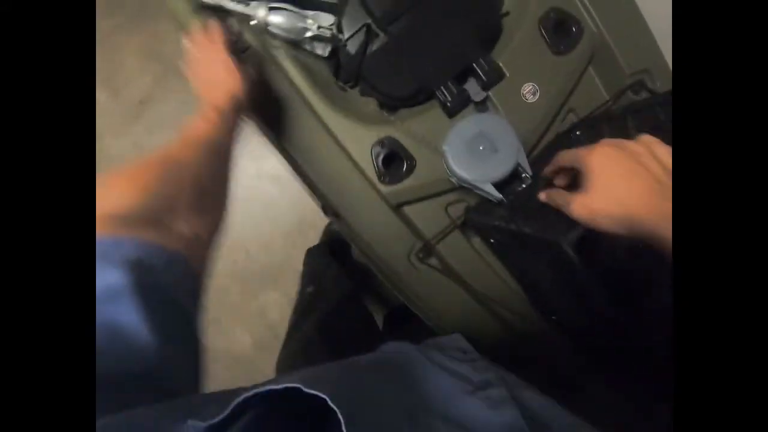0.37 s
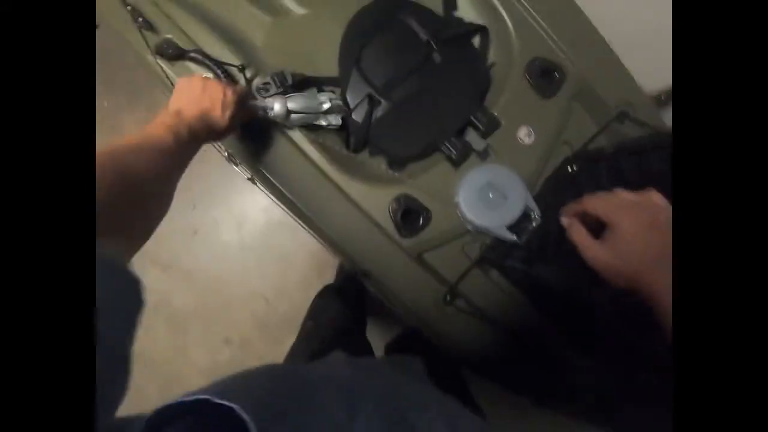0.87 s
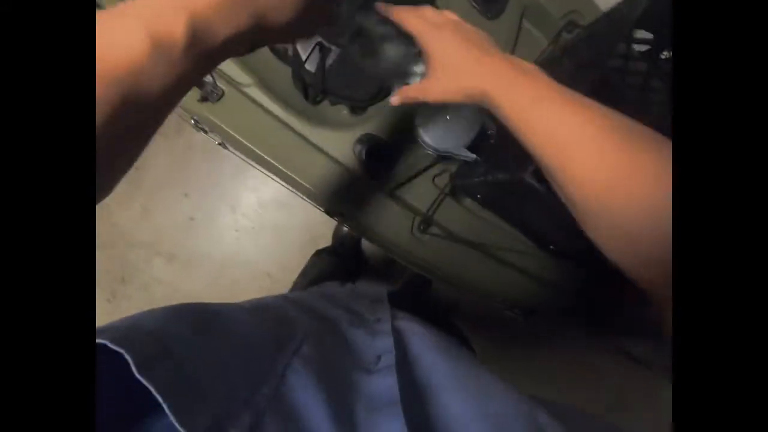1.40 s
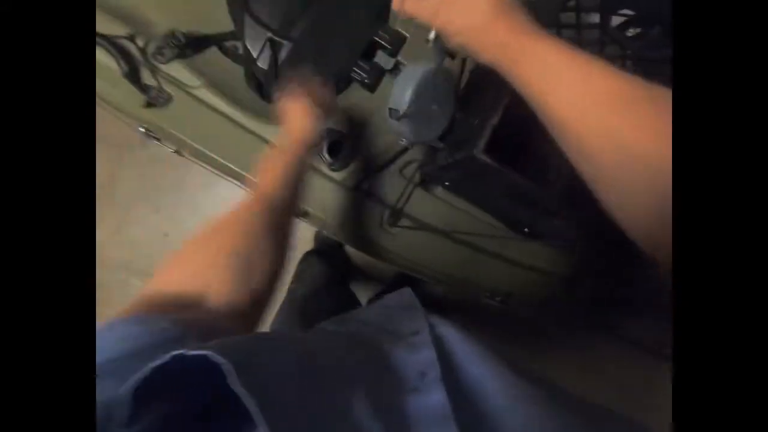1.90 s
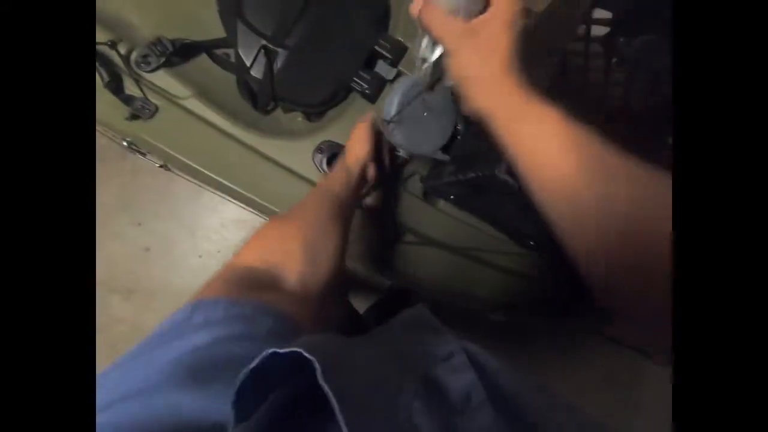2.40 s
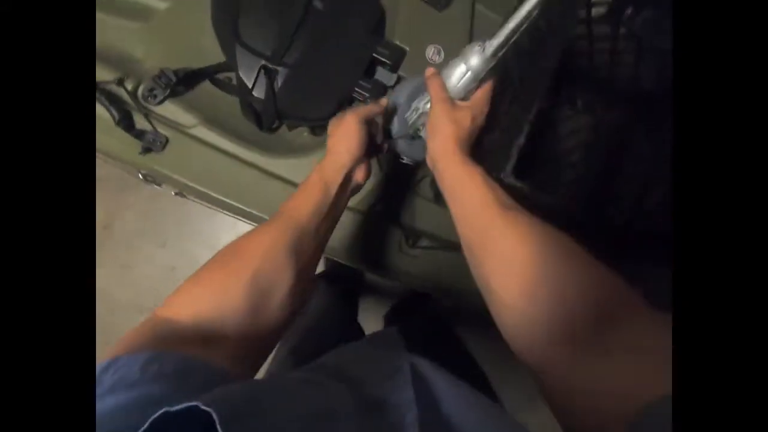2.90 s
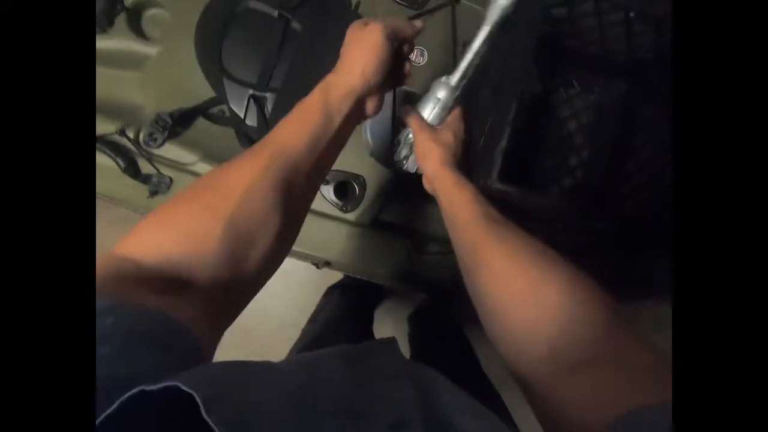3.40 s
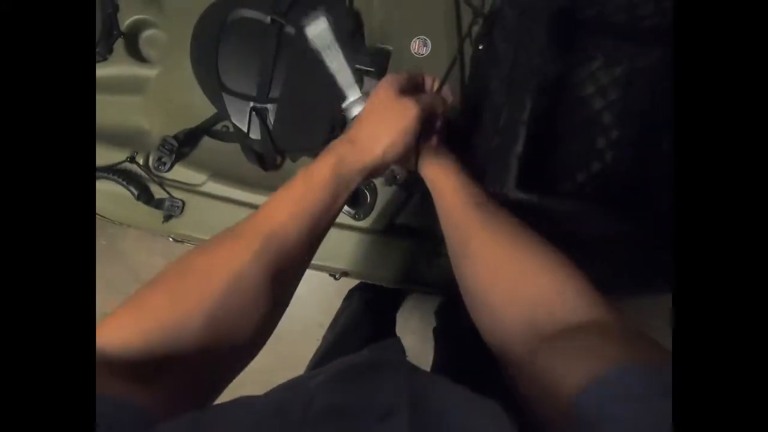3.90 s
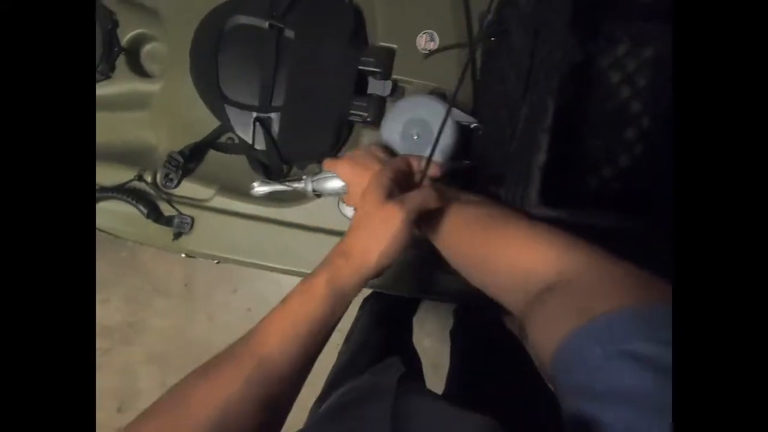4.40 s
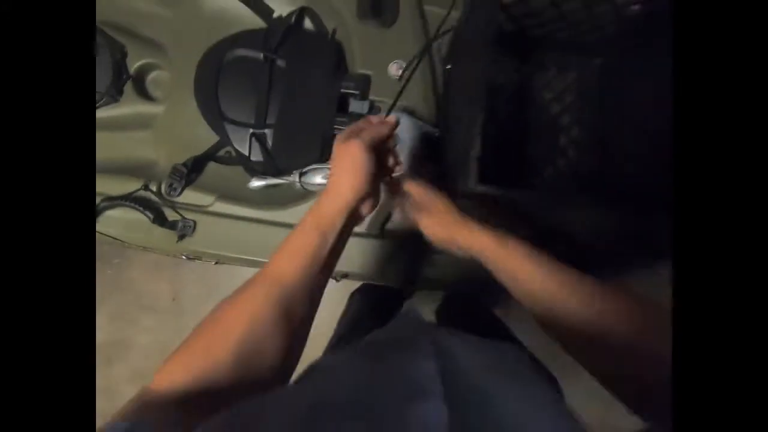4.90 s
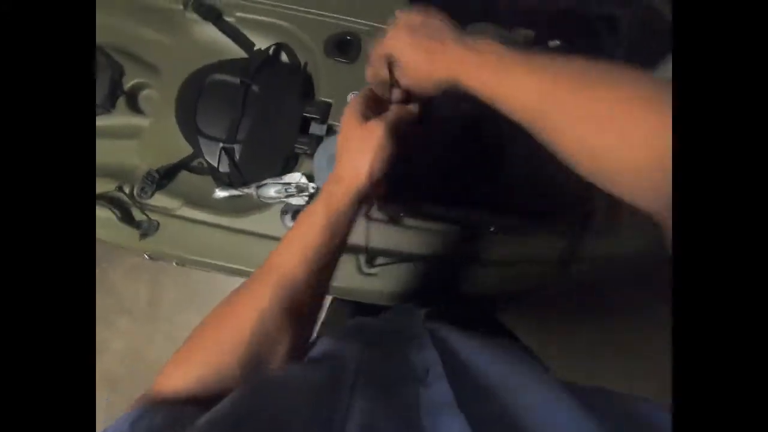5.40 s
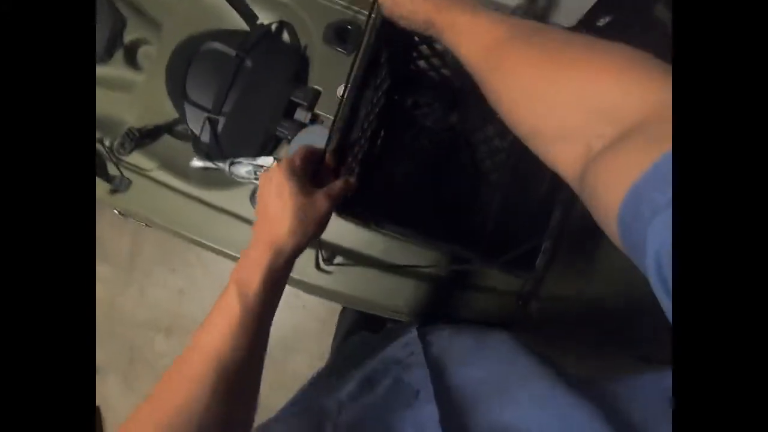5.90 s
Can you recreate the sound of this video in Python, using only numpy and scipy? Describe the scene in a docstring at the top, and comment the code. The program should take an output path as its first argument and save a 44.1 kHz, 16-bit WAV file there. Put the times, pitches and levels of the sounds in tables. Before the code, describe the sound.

Close handling of plastic and metal in a bare garage with a short echo and faint room air. From 0 a soft rubbing rumble, with dull hull knocks at 0.25-0.6 and a tight clatter with thin metallic clinks at 0.75-0.9. Rustling continues; a crisp snap with a clink at 1.24 and more sharp ticks and short clinks at 1.6-1.75. Around 1.9-2.4 it is nearly quiet. A soft thunk at 2.46, then firm hollow knocks and clicks from 2.78 to 3.2, with deep boom and dragging. A brief hollow rub at 3.5, a very sharp crack at 3.76, then dense clatter to 4.05. The hardest thunk lands at 4.36, followed by knocks, chatter and light clinks to 4.8. After a lull near 5, small plastic clicks, muted knocks and rustle at 5.2-5.7, ribbed brushing at 5.8 and a last light knock at 5.95.

```python
"""A hollow plastic hull, close under the microphone in a garage, booms when knocked and rumbles when rubbed.
Blows ring its modes and lumpy noise drives them, as hands shift a plastic crate and a metal rod on it.
Hard edges click as resonant noise bursts, and the rod clinks in decaying sine modes.
Cord and sleeves rustle, a socket rubs and ribs are stroked, all as grainy filtered noise.
The bare walls answer with noise tails, over faint still-room air."""
import sys
import numpy as np
from scipy import signal
from scipy.fft import rfft, irfft, next_fast_len
from scipy.io import wavfile
from scipy.ndimage import map_coordinates

SR = 44100
rng = np.random.default_rng(int(sys.argv[2]) if len(sys.argv) > 2 else 0)


def undo_db(level):
    """Turn decibels back into plain size, where 20 dB means ten times bigger."""
    steps = np.asarray(level, float) / 20
    return 10 ** steps


def transcribe(u):
    """Save the signal u as a 16-bit wav file named by the first command-line argument.

    u: samples, shape (n,) or (channels, n), limited to [-1, 1]; the rate is SR.
    q: integer samples, one column per channel.
    """
    v = np.clip(np.atleast_2d(u).T, -1, 1)
    q = np.round(v * 32767).astype(np.int16)
    wavfile.write(sys.argv[1], SR, q)


N = 266364  # samples

# blows on the hull: (time [s], level [dB], favoured pitch [Hz], boom lift [dB], damping by hands [factor])
BLOWS = [(.239, -15, 230, 5.5, 1.04), (.308, -15.5, 154, -4, 2.9), (0.368, -23.5, 156, -22, 0.62),
         (.418, -24, 326, -26, 1.03), (.555, -21, 185, -0.5, 0.36), (.599, -18.5, 181, -8, 2.6),
         (.761, -20.5, 237, -30, 0.56), (.8, -12, 189, -23, 0.75), (.83, -13, 261, -21, 1.7),
         (1.169, -32, 359, -24, .4), (1.364, -32, 464, -30, 1.1), (1.613, -28, 406, -24, 1.2),
         (2.099, -35, 156, -30.5, .4), (2.463, -17, 390, -4.5, 0.72), (2.551, -18.5, 225, 2, 3),
         (2.78, -8.5, 490, -10, 1.15), (2.79, -5, 939, -30, 1.9), (2.828, -13, 200, 12, 1.6),
         (2.889, -13.5, 356, -18, 2.8), (2.985, -16, 377, -19, 0.97), (3.051, -17, 298, -27, 0.58),
         (3.1, -13, 367, -12, 2.8), (3.167, -0.5, 220, 1, 1.23), (3.2, -6.5, 202, 4, 0.63),
         (3.764, -17, 500, -22.5, 0.86), (3.815, -8, 204, -3, 1.8), (3.874, -4, 238, -7, 1.7),
         (4.021, -4.5, 470, -6, 2.2), (4.049, -14, 245, -0.5, 0.52), (4.138, -13, 363, -23, 1.54),
         (4.359, 4.5, 248, -32, 1.18), (4.385, -3.5, 350, -23, 1.3), (4.408, -2.5, 196, 6, 0.49),
         (4.509, -9, 233, -26, 0.77), (4.589, -9, 224, 0, 1.4), (4.608, -7, 226, -16, 1.4),
         (4.709, -22.5, 210, 2, 2), (4.953, -19, 172, -2, 0.78), (5.271, -26, 232, -4.5, 0.45),
         (5.46, -19.5, 750, -0.5, 1.5), (5.509, -23, 428, -23, 0.89), (5.579, -17.5, 303, -7, 0.91),
         (5.609, -30.5, 296, 11.5, 0.56), (5.947, -19.5, 268, 0, 1.3)]
# modes of the hull: (frequency [Hz], relative level [dB], undamped t60 [s])
HULL_MODES = [(57.7, 0.5, 0.45), (81.7, -11.5, 0.88), (99.2, -4, 0.23), (136.6, -1.5, 0.3),
              (172.7, -6.5, 0.39), (211.1, -3, 0.36), (242.3, 1, 0.18), (298.3, -9, 0.37), (306, -6, 0.16),
              (357.3, -1.5, 0.23), (414.5, -5.5, 0.26), (466.2, -7.5, 0.31), (538.4, -2, 0.13),
              (599.3, -1.5, 0.12), (700, 6, 0.038), (798, -11, 0.21), (939, -8, 0.32), (1119, 8.5, 0.035),
              (1450, -16.5, .1)]


def unit(x):
    """Scales a sound to rms 1."""
    return x / np.sqrt(np.mean(x ** 2) + 1e-20)


def along(points, hz):
    """Reads (frequency [Hz], value) points on a log frequency axis."""
    f, v = np.transpose(points)
    return np.interp(np.log(hz + 1), np.log(f + 1), v)


def bump(hz, centre_hz, octaves):
    """A smooth hill of gain around a frequency."""
    return np.exp(-(np.log2(hz / centre_hz) / octaves) ** 2)


def resonance(f, centre_hz, drive_hz, width_hz):
    """Complex response of one damped resonance; it peaks at drive over width."""
    return 1j * f * drive_hz / (centre_hz ** 2 - f * f + 1j * f * width_hz)


def wobble(rate):
    """A smooth random curve with rate knots a second."""
    knots = rng.standard_normal(int(N * rate / SR) + 4)
    return map_coordinates(knots, [np.arange(N) * rate / SR])


def grainy(spiky_db, rate):
    """Noise of rms 1 whose level wanders from grain to grain, rate grains a second."""
    return unit(rng.standard_normal(N) * undo_db(spiky_db * wobble(rate)))


def filtered(x, response):
    """Passes a sound through a complex response of frequency."""
    m = next_fast_len(x.shape[-1] + SR // 2)
    spectrum = rfft(x, m) * response(np.fft.rfftfreq(m, 1 / SR))
    return irfft(spectrum, m)[..., :x.shape[-1]]


def shifting(x, colour_db):
    """Passes a sound through a colour that changes in time, mean square gain 1 in each frame."""
    hz, t, z = signal.stft(x, SR, nperseg=512)
    gain = undo_db(colour_db(hz[:, None] + 1, t))
    gain = gain / np.sqrt(np.mean(gain ** 2, axis=0))
    return signal.istft(z * gain, SR, nperseg=512)[1][:N]


def add(track, s, sound):
    """Mixes a sound into the track from time s, cut at the track's end."""
    part = track[..., round(s * SR):][..., :sound.shape[-1]]
    part += sound[..., :part.shape[-1]]


def ringing(modes, t, tilt, damping, scatter_db, detune):
    """All modes struck at once, each at a new strength and sign, slightly detuned by the grip; peak 1."""
    hz, db, t60 = np.transpose(modes)[:, :, None]
    strength = undo_db(db + scatter_db * rng.standard_normal(hz.shape)) * tilt(hz)
    strength = strength * rng.choice([-1, 1], hz.shape)
    hz = hz * (1 + detune * rng.standard_normal(hz.shape))
    decay = undo_db(-60 * t * damping / t60)
    ring = np.sum(strength * decay * np.sin(2 * np.pi * hz * t), axis=0)
    return ring / np.abs(ring).max()


def gestures(rows):
    """Movements swell and fade; gives their summed gain and their last column weighted by power."""
    s, db, rise, fall, colour = np.transpose(rows)[:, :, None]
    t = np.arange(0, N + 64, 64) / SR - s
    # rises and falls below 0.02 s, negative ones too, take 0.02 s
    away = np.where(t < 0, -t / rise.clip(.02), t / fall.clip(.02))
    power = undo_db(2 * db - 40 * away)
    total = power.sum(axis=0)
    curves = np.sqrt(total), (power * colour).sum(axis=0) / total
    return [np.interp(np.arange(N) / 64, np.arange(len(c)), c) for c in curves]


def drag():
    """The dragged crate drives the hull's modes with lumpy noise and scrapes above; blows add a short skid."""
    # drags: (hardest time [s], rumble level [dB], 20 dB rise [s], 20 dB fall [s], scrape over rumble [dB])
    drags = [(0, -28, .1, 0.14, -8.5), (.35, -44.5, 2, -1.6, -6), (.62, -35.5, 0.05, 0.38, -18),
             (.82, -32, 0.2, 0.25, -6.5), (1.15, -44.5, 0.2, 0.76, 4.5), (1.61, -41.5, 0.4, 0.55, -20.5),
             (2.17, -46, 0.26, 0.16, 6), (2.61, -30, 0.31, .25, -11), (2.96, -29.5, 0.21, 0.35, -10.5),
             (3.23, -23.5, 0.02, 0.45, -25.5), (3.5, -31, 0.14, 0.3, -23), (3.92, -23.5, .2, .15, -6),
             (4.02, -23, .1, 0.23, -4), (4.25, -35, 0.06, 0.9, -38), (4.53, -20.5, 0.01, 0.14, -16.5),
             (4.68, -34, 0.9, 1.16, -7), (4.92, -30, -0.07, 0.26, -35), (5.1, -33.5, 0.4, 0.2, -14),
             (5.4, -36.5, 0.2, 0.8, -19.5), (5.52, -35.5, 0.7, 0.6, 10.5), (5.62, -29, 0.25, 0.27, -9.5),
             (6.04, -32.5, 0.4, .1, -12)]
    # scrape spectrum: (frequency [Hz], relative level [dB per Hz])
    scrape_colour = [(150, -44), (250, -4), (360, -8.5), (489, -8.5), (1230, -19), (1500, -20.5),
                     (2000, -28.5), (2600, -60.5), (4400, -120)]
    skid_db, skid_t60 = -23.5, 0.24  # under the blow's level, s
    push, scrape_db = gestures(drags)
    skid, t = np.zeros(N), np.arange(SR // 2) / SR
    for s, db, *_ in BLOWS:
        add(skid, s, undo_db(db + skid_db - 60 * t / skid_t60))

    def hull(f):
        # neighbouring modes move in opposite directions
        modes = sum((-1) ** k * undo_db(db) * resonance(f, hz, 9, 5 / t60)
                    for k, (hz, db, t60) in enumerate(HULL_MODES))
        return modes / (1 + (f / 300) ** 2)

    rumble = unit(filtered(grainy(spiky_db=4.5, rate=46), hull))
    scrape = unit(filtered(grainy(spiky_db=3.5, rate=58), lambda hz: undo_db(along(scrape_colour, hz))))
    return push * rumble + (push * undo_db(scrape_db) + skid) * scrape


def rustle():
    """Cord and sleeves make fine grains of friction: a wandering hump, and more treble from smoother cloth."""
    # motions: (fastest time [s], level [dB], 20 dB rise [s], 20 dB fall [s], treble slope [dB per octave])
    motions = [(0, -48.5, .1, 0.3, -1), (.34, -45.5, 0.12, 0.05, -1), (.62, -51.5, 0.22, 1, 3.5),
               (.93, -40.5, 0.44, .33, 0), (1.22, -43.5, 0.3, 0.23, 3), (1.5, -49.5, -0.93, -0.2, 5),
               (1.7, -45.5, 0.27, 0.03, -0.5), (1.98, -66.5, -0.1, 0.6, 2), (2.18, -58, 0.33, .25, -6.5),
               (2.4, -57.5, 0.17, -1, 7), (2.5, -41.5, 0.12, 0, 0.5), (2.72, -66, -6, 0.8, 6),
               (2.82, -47, 0.25, 0.4, 3), (2.99, -42.5, 0.21, 0.4, 0), (3.09, -41, 0.13, 0.08, 6.5),
               (3.25, -50.5, 0.72, 0.5, 0), (3.46, -42, -2.8, -0.2, -19), (3.62, -45.5, -0.1, 0.5, 0.5),
               (3.95, -44.5, 0, 0.5, 3.5), (4.15, -37, 0.24, 0.03, -6.5), (4.28, -47.5, -0.5, -0.7, 6),
               (4.38, -35.5, .09, 0.39, -5.5), (4.64, -43.5, 0, 0.33, 0), (4.95, -57.5, -3.3, 2, -3.5),
               (5.45, -45, 0.34, .5, 4.5), (5.68, -44, 0.33, .3, 8), (5.82, -33.5, 0.27, .08, 2),
               (5.96, -40.5, 0.33, -1.8, 0.5)]
    # cloth spectrum: (frequency [Hz], relative level [dB per Hz])
    cloth = [(530, -27.5), (900, -4), (1050, -16.5), (1360, -11), (2470, -13), (2690, -12), (3260, -11.5),
             (9770, -23), (14200, -26), (16000, -86)]
    gain, slope_db = gestures(motions)
    hump_hz = 2250 * 2 ** (0.18 * wobble(8.8))  # wanders by 0.18 octaves per unit of wobble

    def at(curve, t):
        return np.interp(t * SR, np.arange(N), curve)

    def colour_db(hz, t):
        hump = 6 * bump(hz, at(hump_hz, t), 0.63)
        treble = at(slope_db, t) * np.log2(hz / 3000).clip(0)
        return along(cloth, hz) + hump + treble

    flutter = undo_db(1.2 * wobble(25))
    return gain * flutter * shifting(grainy(spiky_db=1.5, rate=150), colour_db)


def still_air():
    """The still room is steady coloured noise, separate in mid and side."""
    # air spectrum: (frequency [Hz], relative level [dB per Hz])
    air_colour = [(15, -53), (25, 5.5), (70, 4.5), (117, -38), (180, 1), (427, -33), (775, -9.5),
                  (1440, -30.5), (5140, -75), (9840, -33), (16000, -56)]
    noise = rng.standard_normal((2, N))
    return undo_db(-59) * unit(filtered(noise, lambda hz: undo_db(along(air_colour, hz))))


def echo(t60_scale, seconds):
    """Mid and side noise tails of energy 1; each frequency dies at its own speed."""
    # decay of the garage: (frequency [Hz], t60 before scaling [s])
    garage_decay = [(100, 0.3), (1000, 0.34), (4000, 0.22), (12000, 0.29)]
    hz, t, z = signal.stft(rng.standard_normal((2, round(seconds * SR))), SR, nperseg=256)
    t60 = t60_scale * along(garage_decay, hz)[:, None]
    tail = signal.istft(z * undo_db(-60 * t / t60), SR, nperseg=256)[1]
    return tail / np.linalg.norm(tail, axis=1)[:, None]


def spaces(x, t60_scale, seconds):
    """The answer changes as things move: a new tail for each third of a second."""
    out, step = np.zeros((2, N)), SR // 3
    for start in range(0, N, step):
        wet = signal.fftconvolve(x[None, start:start + step], echo(t60_scale, seconds), axes=1)
        add(out, start / SR, wet)
    return out


def garage(source):
    """The bare walls answer after a short gap and return little of the boom; gives mid and side."""
    treble = filtered(source, lambda hz: 1j * hz / (250 + 1j * hz))
    late = np.roll(treble, 250)  # samples; the last ones wrap to the start
    return undo_db(-8) * spaces(late, 1.0, 0.66)


def close_reflections(source):
    """Very short tails from nearby surfaces reach the microphone ports unequally; gives side only."""
    return undo_db(2) * spaces(source, 0.034, 0.02)[1]


def socket():
    """Friction swells and fades in the resonances of a hollow socket."""
    # rubs: (start [s], loudest time [s], end [s], level [dB])
    rubs = [(0.175, 0.245, 0.253, -33.5), (3.446, 3.515, 3.557, -22.5)]
    # socket resonances: (frequency [Hz], width [Hz], relative level [dB])
    cavity = [(426, 61, 5.5), (1210, 65, -13), (1480, 27, -8), (2200, 75, -17), (2540, 22, -17),
              (2924, 33, -12.5), (3680, 140, -40)]

    def hollow(f):
        return sum((-1) ** k * undo_db(db) * resonance(f, hz, width, width)
                   for k, (hz, width, db) in enumerate(cavity))

    t = np.arange(N) / SR
    swell = sum(undo_db(db) * np.interp(t, [start, top, end], [0, 1, 0]) for start, top, end, db in rubs)
    return swell * unit(filtered(grainy(spiky_db=2.5, rate=120), hollow))


def clicks():
    """A sharp edge, then brief chatter, coloured by the part that was hit; long chatter starts softer."""
    # hard contacts: (time [s], peak level [dB], centre [Hz], chatter t60 [s], panel lift [dB])
    contacts = [(.235, -33, 1480, 0.027, -6), (.6115, -32, 1320, 0.092, 13),
                (0.7492, -29, 3050, 0.079, -14), (0.782, -19, 2620, 0.13, -26),
                (0.8074, -20, 2900, 0.1, -18), (0.826, -23, 2700, .038, -8), (.857, -31, 2710, .028, -18.5),
                (0.88, -17, 3020, 0.035, -34), (1.2066, -29, 2020, 0.13, -25),
                (1.229, -24.5, 2800, 0.1, -27), (1.2384, -3.5, 4840, 0.019, -39),
                (1.371, -40, 2180, 0.035, -1), (1.5254, -29, 1600, .043, -26),
                (1.551, -27.5, 2110, .037, -24.5), (1.5725, -33, 3260, 0.036, -23.5),
                (1.609, -26.5, 1570, .023, -36), (1.6154, -5, 3580, 0.028, -36),
                (1.6597, -15.5, 1480, 0.062, -31), (1.672, -13.5, 1530, 0.027, -31),
                (1.7413, -14, 3230, 0.028, -32), (1.7558, -23.5, 3300, 0.03, -36),
                (1.887, -48.5, 2980, 0.02, -30.5), (2.1456, -33, 1840, 0.1, -22),
                (2.4652, -18, 1220, 0.091, 24), (2.7819, -11, 2400, 0.085, -17),
                (2.793, -14, 2700, 0.042, 12), (2.822, -18.5, 2700, 0.058, -17.5),
                (2.841, -20, 1440, .028, -7.5), (2.8885, -9, 2450, 0.035, 14.5),
                (2.9881, -16, 1620, 0.026, -28), (3.056, -22.5, 2700, 0.047, -12),
                (3.1033, -17.5, 1770, 0.05, 15), (3.1702, -9, 2560, 0.028, 2),
                (3.2166, -28, 1650, 0.054, -8), (3.3417, -21, 2860, 0.035, -27),
                (3.4688, -28.5, 1480, 0.18, -8), (3.5395, -8, 3200, 0.037, -33),
                (3.6775, -27.5, 1210, 0.059, -15.5), (3.7624, 5.5, 3340, 0.027, -53),
                (3.7989, -7.5, 2510, 0.072, -32), (3.8251, -13, 2870, 0.088, -32),
                (3.8535, -11.5, 3000, 0.16, 11), (3.8737, -5, 1640, 0.044, 6.5),
                (3.9008, -13, 2900, 0.036, -19), (4.0233, -13, 1580, 0.041, -21),
                (4.1424, -32, 1360, .027, -8), (4.192, -34, 2160, 0.049, -13.5),
                (4.305, -32, 1900, 0.038, -17), (4.324, -25, 1800, .06, -18), (4.339, -18, 1750, 0.11, 5),
                (4.36, -5.5, 1250, 0.026, 5.5), (4.4842, -26, 1200, 0.11, 3),
                (4.528, -27.5, 1350, 0.02, 12), (4.585, -21.5, 1620, .11, -20),
                (4.597, -17, 3080, 0.12, -17), (4.7454, -29.5, 1720, 0.039, -12),
                (4.805, -24, 2900, 0.042, -26), (4.9632, -36.5, 2860, .05, -17),
                (4.985, -40, 3570, .04, -20), (5.016, -41.5, 4400, 0.034, -18.5),
                (5.0982, -31, 1610, .05, -12), (5.144, -35, 1590, 0.048, -26),
                (5.2116, -28, 2270, .033, -23), (5.2885, -22, 2570, 0.035, 3),
                (5.3244, -23, 4460, 0.042, -1), (5.357, -18.5, 2560, 0.032, -25),
                (5.438, -24.5, 2360, .11, 0), (5.4645, -15.5, 1950, 0.061, 5),
                (5.511, -17.5, 1330, 0.13, 4), (5.5762, -23.5, 2400, 0.11, 3),
                (5.6168, -23, 2470, 0.024, 2), (5.693, -26, 3150, 0.019, -16),
                (5.9472, -20, 5100, 0.038, -8)]
    out, t = np.zeros(N), np.arange(SR // 8) / SR

    def peak(f, hz, damping):
        return resonance(f, hz, hz, damping * hz)

    for s, db, centre_hz, t60, panel_db in contacts:
        chatter = undo_db(-60 * t / t60) * (1 - np.exp(-t / (0.0056 * t60)))
        snap = 1.08 * undo_db(-60 * t / 0.0044)
        burst = rng.standard_normal(len(t)) * (chatter + snap)
        # further resonances of the part, new each time
        others = (centre_hz * 2 ** rng.uniform(-0.94, 1.16, 4)).clip(1300, 9000)
        # hard blows flatten the treble edge, small parts sharpen it
        edge_db = -12 - 0.44 * db + 3.6 * np.log2(centre_hz / 2500)

        def colour(f):
            part = peak(f, centre_hz, 0.18) + 0.37 * sum(peak(f, hz, 0.25) for hz in others)
            small = -f * f / (1200 ** 2 - f * f + 1.2j * f * 1200)  # a small part radiates no bass
            edge = undo_db(edge_db) * (1j * f / (5500 + 1j * f)) ** 2 / (1 + 1j * f / 11000)
            panel = undo_db(panel_db - 0.5) * peak(f, 800, 0.37)  # the panel behind the part
            return small * part / (1 + 1j * f / 6000) + edge + panel

        tick = filtered(burst, colour)
        add(out, s, undo_db(db) * tick / np.abs(tick).max())
    return out


def thumps():
    """Blows ring the hull, most of all the modes that move at the spot struck; weight adds the deep boom."""
    out, t = np.zeros(N), np.arange(SR // 2) / SR
    for s, db, centre_hz, boom_db, damping in BLOWS:
        octaves = max(1.0 + 0.1 * db, .2)  # softer blows reach fewer modes

        def spot(hz):
            spill = 0.31 / (1 + (hz / (3 * centre_hz)) ** 2)
            boom = undo_db(boom_db + 4.5) * bump(hz, 92, 0.54)
            return spill + bump(hz, centre_hz, octaves) + boom

        ring = ringing(HULL_MODES, t, spot, damping, scatter_db=2, detune=.025)
        add(out, s, undo_db(db) * ring * (1 - np.exp(-t / 0.0019)))
    return out


def strokes():
    """Quick brushing over plastic: swells of grit around the pitch of the ribs that each stroke crosses."""
    # strokes: (start [s], loudest time [s], end [s], level [dB], centre [Hz])
    brushes = [(0.299, 0.308, 0.39, -45, 4000), (0.89, 0.975, 1.14, -40.5, 3440),
               (2.45, 2.482, 2.43, -32.5, 1890), (3.78, 3.844, 4.04, -32, 2900),
               (4.85, 4.874, 4.89, -46, 3900), (5.725, 5.797, 5.9, -31.5, 2770),
               (5.926, 5.957, 5.77, -38.5, 4860)]
    out, t = np.zeros(N), np.arange(N) / SR
    for start, top, end, db, centre_hz in brushes:
        colour = lambda hz: bump(hz + 1, centre_hz, 0.47) + 0.54 * bump(hz + 1, centre_hz, 1.45)
        grit = unit(filtered(grainy(spiky_db=2, rate=120), colour))
        swell = np.interp(t, [start, top, end], [0, 1, 0])  # silent where the end precedes the start
        out = out + undo_db(db) * swell * grit
    return out


def clinks():
    """The rod rings mostly in the few modes that move where it is touched; loose joints make it flutter."""
    # touches: (time [s], level [dB], favoured mode [Hz], second favoured mode [Hz], damping by hands [factor])
    touches = [(0.781, -28.5, 2702, 3828, 0.44), (.8, -28, 6650, 6860, 0.75), (.857, -33, 5800, 2950, 1.5),
               (0.882, -18, 3180, 2950, 2.5), (1.229, -25, 2950, 7284, 2.2), (1.239, -27, 7450, 4965, 2.1),
               (1.526, -36.5, 1550, 3450, 2.1), (1.617, -14.5, 1550, 4965, 4.3),
               (1.659, -25.5, 1430, 1550, .9), (1.741, -29, 4965, 3140, 0.9),
               (3.057, -35.5, 2702, 2950, 2.2), (3.345, -33, 3180, 2702, 2.9),
               (3.539, -42, 7284, 3180, 1.7), (3.82, -24, 6860, 2950, 2.6), (3.897, -27, 6860, 7284, 1.7),
               (4.308, -37, 1700, 1890, 1.6), (4.324, -35, 3450, 1700, 1.3),
               (4.336, -28.5, 7284, 4965, 2.6), (4.34, -27, 1700, 3450, 2.2),
               (4.584, -32.5, 4965, 1550, 1.4), (4.612, -20, 4965, 6860, 1.6),
               (4.62, -35.5, 9700, 11420, 1), (4.806, -27.5, 2950, 6860, 2), (4.962, -41, 2950, 3828, 2.6)]
    # modes of the rod: (frequency [Hz], relative level [dB], undamped t60 [s])
    rod_modes = [(1430, 0, .2), (1550, 0, .2), (1700, 0, .1), (1890, 0, .12), (2702, 0, .12),
                 (2950, 0, .12), (3180, 0, .1), (3450, 0, .1), (3828, -4, .1), (4965, 0, .12),
                 (5800, 0, .08), (6650, 0, .13), (6860, -2, .14), (7284, -2, .16), (8900, -4, .2),
                 (9700, -5, .14), (11420, -10, .2), (12590, -10, .1)]
    out, t = np.zeros(N), np.arange(SR // 3) / SR
    for s, db, *favoured_hz, damping in touches:
        # modes an octave above the favoured ones take a smaller share
        near = lambda hz: .03 + sum(bump(hz, at, .05) + 0.2 * bump(hz, 2 * at, .08) for at in favoured_hz)
        ring = ringing(rod_modes, t, near, damping, scatter_db=1.5, detune=.004)
        add(out, s, undo_db(db) * ring * (1 - np.exp(-t / 0.0012)))
    return out * undo_db(6 * wobble(220))


def scene():
    """Direct sound in the middle, with near reflections, garage and air spread as mid and side."""
    # width at two close microphone ports: (frequency [Hz], side gain [dB])
    port_width = [(60, -26), (110, -27), (200, -27), (380, -22), (700, -7), (1290, -3), (2380, -9),
                  (4400, -8), (8120, -2), (15000, 0)]
    source = drag() + rustle() + socket() + clicks() + thumps() + strokes() + clinks()
    mid, side = garage(source) + still_air()
    side = side + close_reflections(source)
    side = filtered(side, lambda hz: undo_db(along(port_width, hz)))
    return source + mid + np.array([side, -side])


def band_limit(x):
    """A steep low-pass at the top of the band."""
    return signal.sosfilt(signal.butter(12, 16810, fs=SR, output="sos"), x)


def record(dry):
    """The microphone colours the sound and cuts deep bass; the loudest peaks are softly clipped."""
    # microphone response: (frequency [Hz], gain [dB])
    mic_colour = [(6000, -1), (10000, -2), (11500, -12.5), (16000, -18)]
    x = filtered(dry, lambda hz: undo_db(along(mic_colour, hz)) * (1j * hz / (35 + 1j * hz)) ** 2)
    mix = x / (1 + np.abs(x) ** 8) ** (1 / 8)
    return band_limit(mix)


dry = scene()
out = record(dry)
transcribe(out)
```